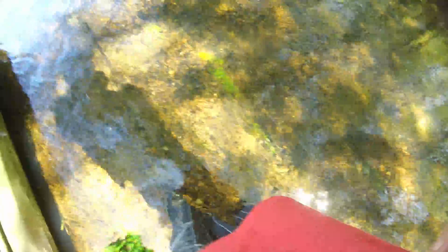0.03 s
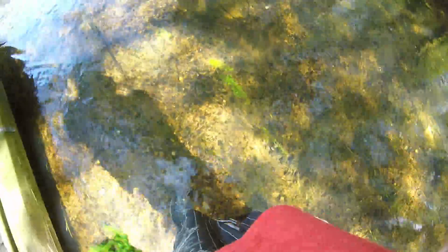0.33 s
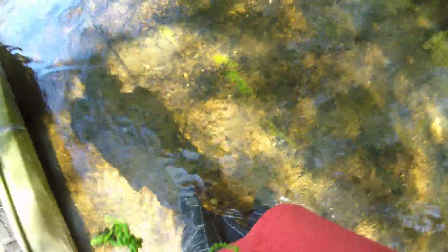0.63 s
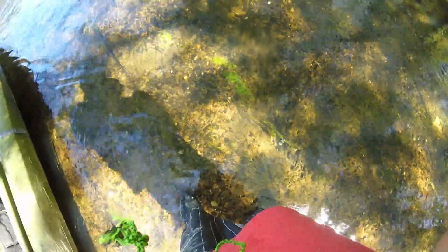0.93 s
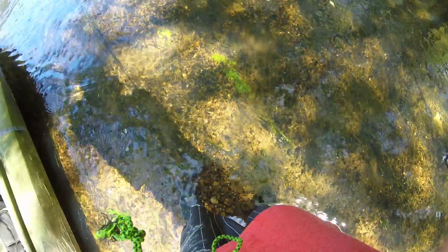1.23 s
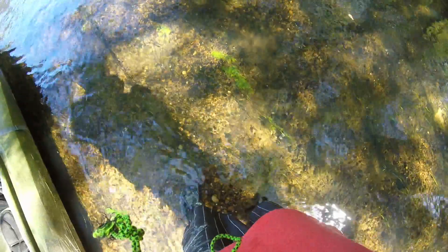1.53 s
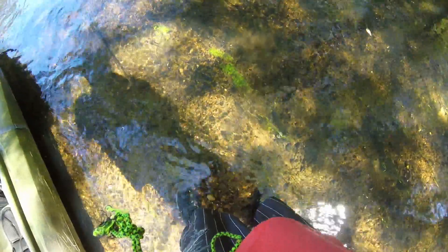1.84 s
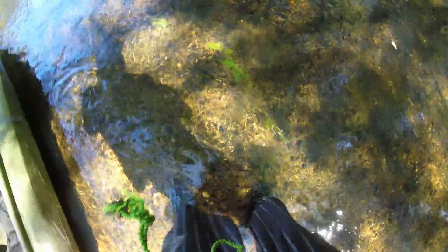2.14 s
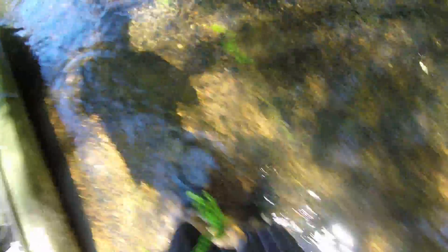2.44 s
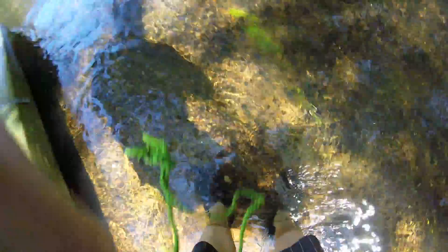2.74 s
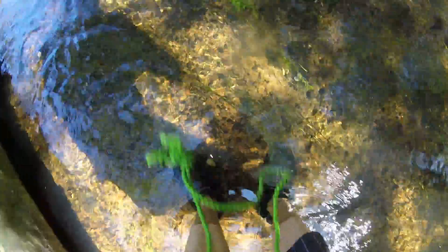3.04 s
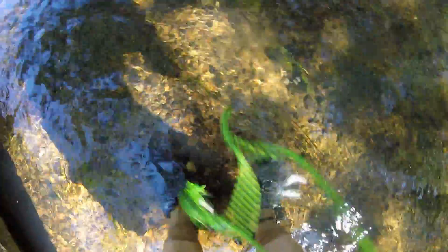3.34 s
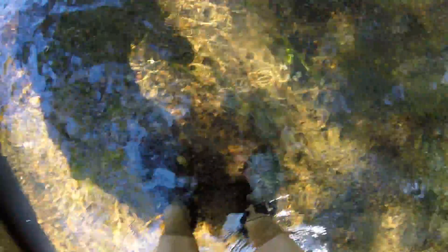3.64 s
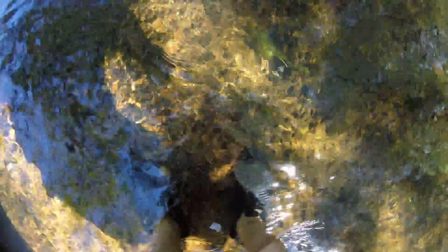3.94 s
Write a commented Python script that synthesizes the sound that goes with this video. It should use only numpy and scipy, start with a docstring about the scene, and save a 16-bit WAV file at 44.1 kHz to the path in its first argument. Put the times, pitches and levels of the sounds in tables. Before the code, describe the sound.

Close camera handling noise, with thumps, ticks and rubbing, over softly flowing water.

```python
"""A shallow stream fades in and runs quietly past someone holding a camera, whose hand gives the case
a faint bump and a brief rub. After about two seconds they shift their grip: the hand bumps the case
with dull thumps over a low rumble, while fingers catch on it with dry ticks and rub it in short strokes.
Ticks and strokes make the case ring at the same few pitches. Last, a finger scuffs the microphone port."""
import sys
import numpy as np
from scipy import signal
from scipy.fft import rfft, irfft
from scipy.io import wavfile

SR = 44100
rng = np.random.default_rng(int(sys.argv[2]) if len(sys.argv) > 2 else 0)


def bounce(signal):
    """Save signal as a 16-bit WAV file at the path given by the first command-line argument."""
    frames = np.transpose(np.atleast_2d(signal))
    limited = np.clip(frames, -1, 1)
    pcm = np.round(limited * 32767).astype(np.int16)
    wavfile.write(sys.argv[1], SR, pcm)


N = 176400  # four seconds


def from_db(db):
    """Turn decibels (dB) into a number to multiply a sound by."""
    return 10 ** (np.asarray(db) / 20)


def rms_one(x):
    """Scale a signal so that its average power is one."""
    return x / np.sqrt(np.mean(x ** 2) + 1e-20)


def level(rows):
    """A volume curve through (seconds, dB) points, silent before the first."""
    s, db = np.transpose(rows)
    return from_db(np.interp(np.arange(N) / SR, s, db, left=-120))


def drift(per_s, size=N):
    """A wandering curve, about one in size, that heads for a new random value per_s times a second."""
    points = rng.standard_normal(4000)
    return rms_one(np.interp(np.arange(size) / SR * per_s, np.arange(len(points)), points))


def coloured(x, spectrum):
    """Shape a sound's lows and highs with (Hz, dB) points, then scale its power to one."""
    hz, db = np.transpose(spectrum)
    bin_hz = np.maximum(np.fft.rfftfreq(N, 1 / SR), 1)
    gain = from_db(np.interp(np.log(bin_hz), np.log(hz), db))
    low_cut = np.minimum(bin_hz / 20, 1) ** 2
    return rms_one(irfft(rfft(x) * gain * low_cut, N))


def resonance(x, hz, width_hz):
    """Make a sound ring around one pitch; a narrower width rings longer."""
    r = np.exp(-np.pi * width_hz / SR)
    feedback = [1, -2 * r * np.cos(2 * np.pi * hz / SR), r * r]
    return signal.lfilter(np.array([1, 0, -1]) * (1 - r * r) / 2, feedback, x + 1e-18)


def swell(t, rise_s, fall_s):
    """Rise to one at time zero and die away, tenfold in each rise or fall time."""
    return 10 ** np.maximum(np.minimum(t / rise_s, -t / fall_s), -10)


def add(out, s, sound):
    """Mix a sound in from s seconds on, dropping what falls outside."""
    at = int(s * SR) + np.arange(len(sound))
    inside = (at >= 0) & (at < N)
    out[at[inside]] += sound[inside]


def stream():
    """Running water makes an even wash of noise that ripples a little."""
    # How loud the water is. Each row: time in seconds, level in dB.
    loudness = [(.05, -100), (.08, -71), (.22, -69.5), (.5, -64.5), (.8, -57.5), (2.0, -57), (4.0, -55.5)]
    # The water's tone. Each row: frequency in Hz, relative strength in dB.
    tone = [(18, -17), (30, 2), (132, -3), (567, -10.5), (662, -12), (815, -12.5), (1520, -16), (2490, -19),
            (7240, -29), (15000, -43)]
    ripple_db = .4 * drift(per_s=25)
    wash = rng.standard_normal(N) * from_db(ripple_db)
    return level(loudness) * coloured(wash, tone)


def grip():
    """The hand bumps the case with soft pushes, and the sway of the held case makes a low rumble."""
    # Bumps of the hand. Each row: time in seconds, strength of the push in dB, length in seconds.
    bumps = [(0.076, -49.5, 0.022), (0.134, -44, 0.034), (2.144, -28.5, 0.014), (2.151, -30, 0.0032),
             (2.178, -28.5, 0.026), (2.358, -36.5, 0.017), (2.464, -34.5, .008), (2.53, -32, 0.015),
             (2.585, -29.5, 0.0054), (2.617, -20.5, 0.03), (2.667, -35.5, 0.002), (2.7246, -36, 0.0022),
             (2.73, -32.5, 0.019), (2.78, -40.5, .01), (2.813, -37, .008), (3.953, -26, 0.017)]
    # The rumble's tone. Each row: frequency in Hz, relative strength in dB.
    rumble_tone = [(20, -2), (50, -3.5), (100, -9.5), (200, -16), (400, -24.5), (1000, -60)]
    # How loud the rumble is. Each row: time in seconds, level in dB.
    rumble_loudness = [(2.05, -67), (2.2, -65), (2.42, -48.5), (2.46, -40), (2.62, -43.5), (2.76, -54.5),
                       (2.95, -55), (3.25, -57.5), (3.32, -44.5), (3.58, -53.5), (3.9, -46.5), (4, -47)]
    t = np.arange(N) / SR
    pushes = np.zeros(N)
    for s, db, length_s in bumps:
        bell_curve = np.exp(-np.minimum((2 * (t - s) / length_s) ** 2, 50))
        pushes += from_db(db) * bell_curve
    # Cutting the lows under 28 Hz makes each push swing back.
    thumps = signal.sosfilt(signal.butter(2, 28, "high", fs=SR, output="sos"), pushes)
    rumble = level(rumble_loudness) * coloured(rng.standard_normal(N), rumble_tone)
    return 2 * thumps + rumble


def slips(size=N):
    """Skin sticks and slips, making dense clicks of uneven size that come in shaky bursts."""
    slips_per_s, spread_db, judder_db = 7000, 3, 2.5
    strengths = from_db(spread_db * np.minimum(rng.exponential(1, size), 4))
    directions = rng.choice([-1, 1], size)
    slipping = rng.random(size) < slips_per_s / SR
    judder = from_db(judder_db * drift(per_s=140, size=size))
    return rms_one(strengths * directions * slipping * judder)


def case(force, treble_force, wall_force):
    """The case rings: broad force drives its main pitches, sharp force the high ones, blunt its wall."""
    # Where the case rings. Each row: pitch in Hz, width in Hz, relative strength in dB.
    pitches = [(944, 180, -17.5), (1180, 260, -4), (1470, 90, 5.5), (1877, 293, 3.5), (2234, 229, 4),
               (2788, 296, 0.5), (3400, 357, 0), (4040, 410, -6), (4890, 1060, -19.5), (5810, 420, -17.5),
               (6860, 1120, -21.5), (8230, 480, -20), (10100, 840, -26.5), (11160, 850, -30),
               (14800, 800, -43)]
    treble_hz, wall_hz, wall_db = 5200, 864, -10.5
    dull_wall = signal.sosfilt(signal.butter(2, wall_hz, fs=SR, output="sos"), wall_force)
    out = from_db(wall_db) * dull_wall
    for k, (hz, width_hz, db) in enumerate(pitches):
        drive = force if hz < treble_hz else treble_force
        out += (-1) ** k * from_db(db) * resonance(drive, hz, width_hz)  # neighbours swing opposite ways
    return out


def rubbing():
    """Fingers rub the case: each stroke swells and fades as the slipping skin makes the case ring."""
    # Finger strokes. Each row: time of the peak, rise time and fall time in seconds, level in dB,
    # treble boost in dB, pitch in Hz that the place of contact brings out.
    strokes = [(0.138, .03, 0.0085, -60, 10, 3870), (2.222, 0.15, 0.025, -54, 12, 2870),
               (2.291, 0.16, 0.072, -51, 9.5, 2030), (2.37, 0.072, 0.067, -47, 4.5, 2020),
               (2.475, 0.064, 0.12, -32, 5.5, 1910), (2.535, 0.078, .1, -40, -3, 1890),
               (2.601, 0.049, 0.029, -28, 8.5, 1850), (2.623, 0.033, 0.025, -16.5, -2.5, 1910),
               (2.661, 0.052, 0.063, -41.5, 4, 1770), (2.716, 0.068, 0.037, -38, 4.5, 3000),
               (2.799, 0.044, 0.081, -51, 8, 3240), (2.877, 0.024, 0.013, -44, 4, 3420),
               (2.911, 0.021, 0.028, -46, 1, 3440), (3.0, 0.081, 0.11, -56.5, -2, 3440),
               (3.14, 0.056, .06, -50, 7, 2400), (3.174, 0.05, 0.062, -50, 6, 2060),
               (3.302, 0.015, 0.033, -34.5, 1, 2770), (3.366, 0.013, 0.012, -32, 2, 2110),
               (3.419, 0.081, 0.085, -43.5, 4, 3470), (3.468, 0.043, 0.047, -50, 13, 4030),
               (3.498, 0.062, 0.1, -37.5, 6, 2440), (3.594, 0.019, .06, -51, 15, 3100),
               (3.62, 0.057, 0.037, -41, 3, 3950), (3.699, 0.031, 0.026, -42, 3, 3940),
               (3.733, 0.03, 0.063, -40.5, 2, 3030), (3.762, 0.056, 0.048, -37, 4, 2800),
               (3.834, 0.025, 0.021, -42.5, 2, 3500), (3.877, 0.027, 0.026, -42.5, 1, 3400),
               (3.995, 0.091, .1, -41.5, 13.5, 2000)]
    out = np.zeros(N)
    t = np.arange(-SR // 5, SR // 3) / SR  # seconds from the stroke's peak
    for s, rise_s, fall_s, db, treble_db, hz in strokes:
        friction = slips(size=len(t))
        force = friction + from_db(-1) * resonance(friction, hz, width_hz=700)
        rub = rms_one(case(force, friction * from_db(treble_db), friction))
        add(out, s + t[0], from_db(db) * swell(t, rise_s, fall_s) * rub)
    return out


def ticks():
    """A finger catches and lets go: one hard, gritty slip, with a hollow ring set by where it touches."""
    # Finger catches. Each row: time in seconds, level in dB, pitch of the hollow ring in Hz,
    # then the relative strengths in dB of that ring, the treble and the wall.
    catches = [(2.1477, -42.5, 2500, -13, -8, 17), (2.346, -45, 1630, -7, 2, 21),
               (2.4600, -30, 1980, 4, 10, 8), (2.4944, -31, 1750, 5, 12, 6),
               (2.5130, -23, 3030, -2.5, 4, -3), (2.5330, -34, 1810, -3, 10, -9),
               (2.582, -27, 1770, 5, 7.5, 0), (2.6080, -19.5, 2100, 6.5, 12, 5),
               (2.666, -26.5, 3000, 5.5, 3, 12), (2.721, -37, 1760, -12, 7, 6),
               (2.7495, -47, 1290, 8, 0, 0), (2.9172, -35, 2250, -4, -2, -10),
               (3.2448, -36.5, 2090, -8, 0, 3.5), (3.2864, -40, 1280, 0, 2, 13),
               (3.3019, -29.5, 1970, 3, 5, 6), (3.3127, -32.5, 1510, -2, -5, -5),
               (3.3581, -24.5, 1750, 5.5, 8, 12), (3.3870, -31.5, 1700, -16, -3, 9),
               (3.4154, -37, 1900, -10, 1, 9), (3.4294, -35.5, 1500, 1, -3, 8),
               (3.476, -30, 3460, -8.5, 2, -10), (3.4831, -18.5, 1340, 4, -9, -5),
               (3.6704, -37.5, 1520, -3, -6, 9.5), (3.702, -26.5, 1600, 1, -5, 5),
               (3.801, -36.5, 1500, -9, 0, 5), (3.8228, -37, 1710, 0, 0, 5), (3.8368, -41, 3470, -5, 9, 0),
               (3.861, -32.5, 1470, -12, 1.5, -1), (3.8746, -33.5, 2120, -3, 7, 11)]
    ring_width_hz, span_s = 470, 0.0026
    out = np.zeros(N)
    t = np.arange(-400, 1200) / SR  # seconds from the slip
    click = 1. * (t == 0)
    for s, db, hz, ring_db, treble_db, wall_db in catches:
        grit = 0.18 * rng.standard_normal(len(t)) * swell(t, rise_s=0.0033, fall_s=0.0039)
        force = click + grit
        body = case(force, force * from_db(treble_db), force * from_db(wall_db))
        ring = resonance(resonance(click, hz, ring_width_hz), hz, ring_width_hz)
        tick = rms_one(body) + from_db(ring_db) * rms_one(ring)
        strength = np.sqrt(np.sum(tick ** 2) / (span_s * SR))  # as if all its energy fell within span_s
        add(out, s + t[0], from_db(db) * tick / strength)
    return out


def port_scuff():
    """Skin slipping right on the port, the microphone's opening, sounds fuller and lower."""
    # How loud the scuff is. Each row: time in seconds, level in dB.
    loudness = [(3.9, -66), (3.91, -41), (3.92, -34.5), (3.935, -29), (3.954, -25.5), (3.964, -40),
                (3.985, -62)]
    # The scuff's tone. Each row: frequency in Hz, relative strength in dB.
    tone = [(60, -6), (230, -4.5), (370, 2.5), (620, -8), (950, -16.5), (1500, -13), (2150, -2),
            (2450, -10.5), (2900, -13), (3400, -29), (4200, -21), (5300, -31), (6500, -35), (9000, -59),
            (15000, -62)]
    return level(loudness) * coloured(slips(), tone)


def scene():
    """The stream with the close sounds of the hand on top, in one channel."""
    return (stream() + grip() + rubbing() + ticks() + port_scuff())[None]


def record(dry):
    """Cut away the very highest treble."""
    cutoff_hz = 15500
    return signal.sosfilt(signal.ellip(10, .2, 80, cutoff_hz, fs=SR, output="sos"), dry)


dry = scene()
out = record(dry)
bounce(out)
```